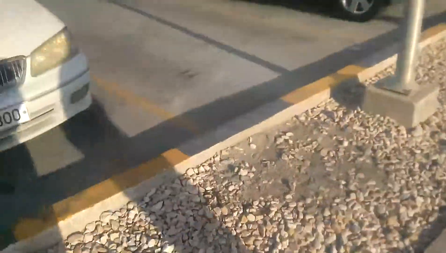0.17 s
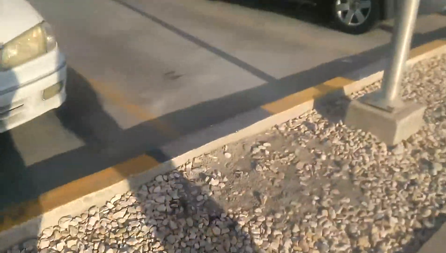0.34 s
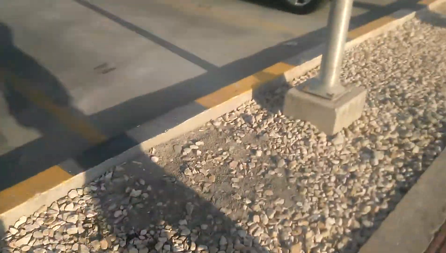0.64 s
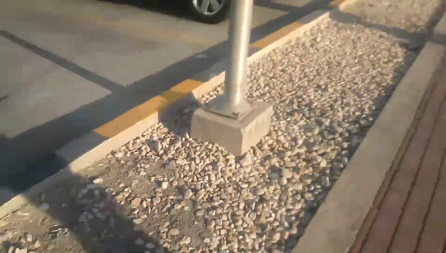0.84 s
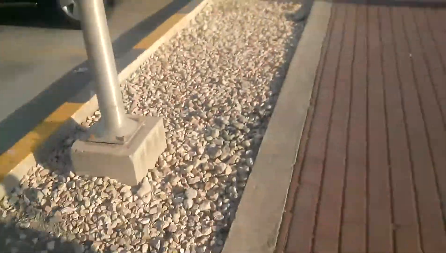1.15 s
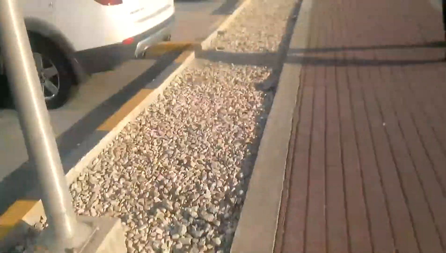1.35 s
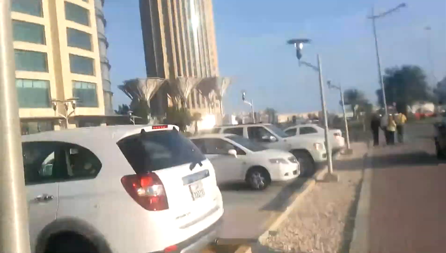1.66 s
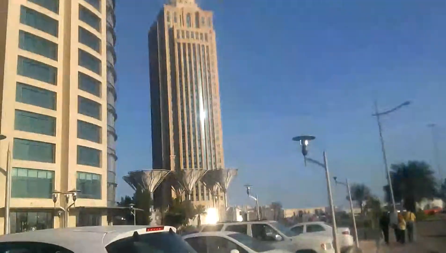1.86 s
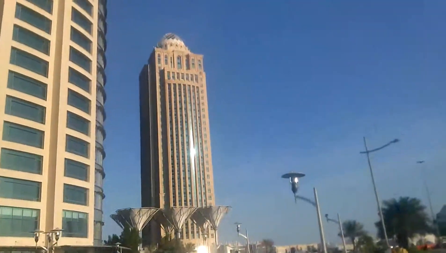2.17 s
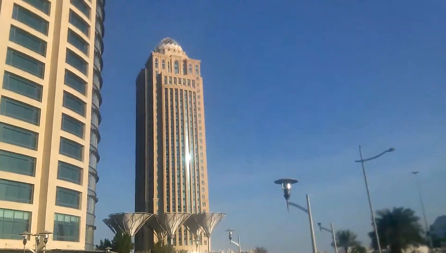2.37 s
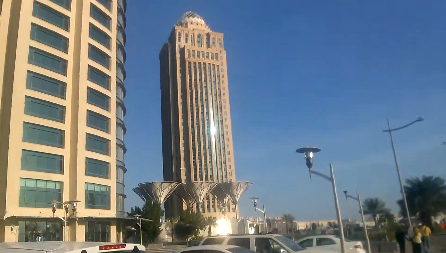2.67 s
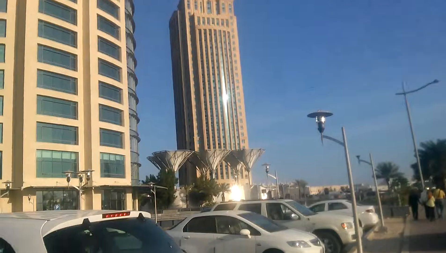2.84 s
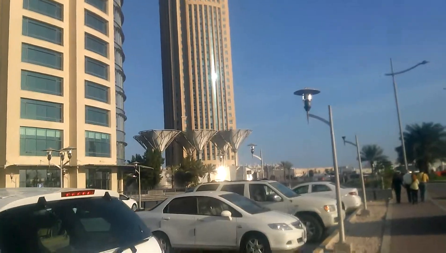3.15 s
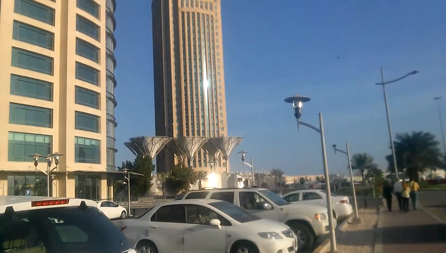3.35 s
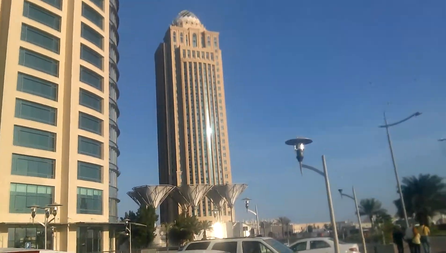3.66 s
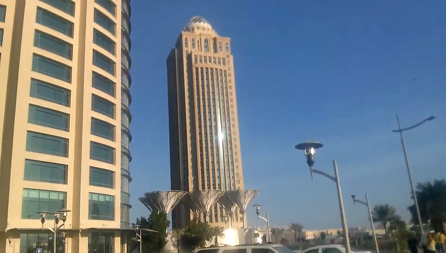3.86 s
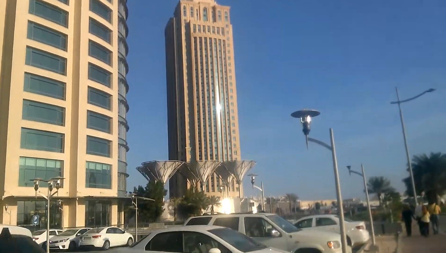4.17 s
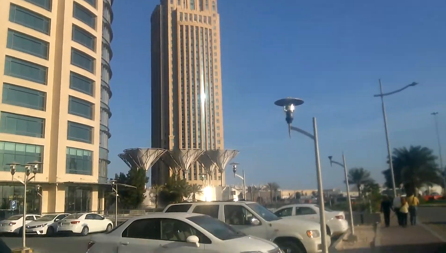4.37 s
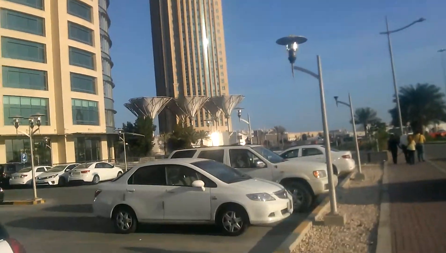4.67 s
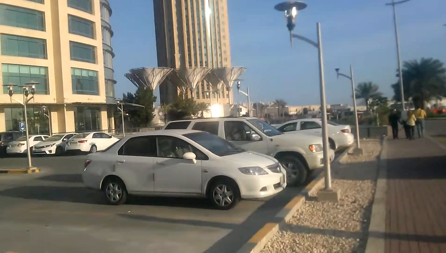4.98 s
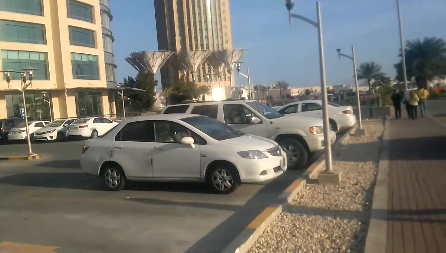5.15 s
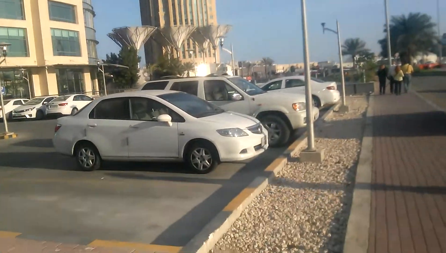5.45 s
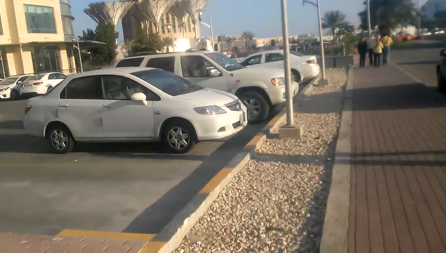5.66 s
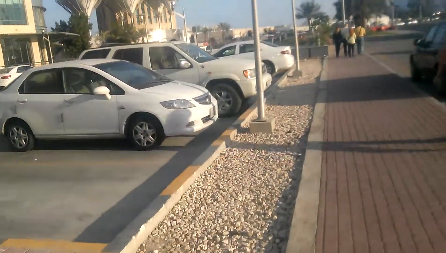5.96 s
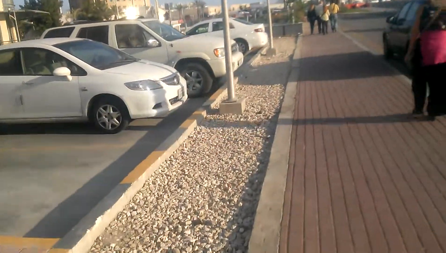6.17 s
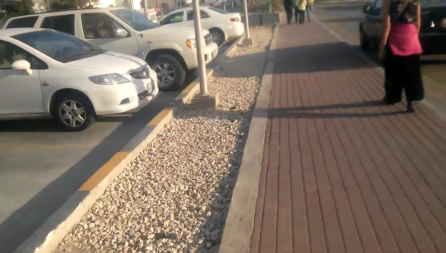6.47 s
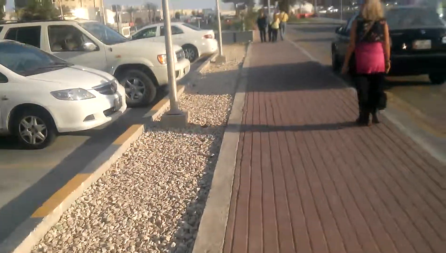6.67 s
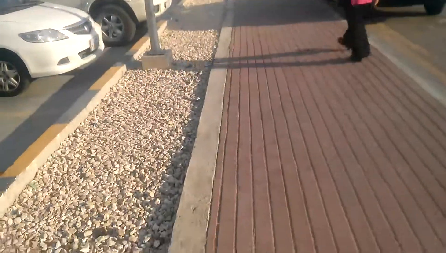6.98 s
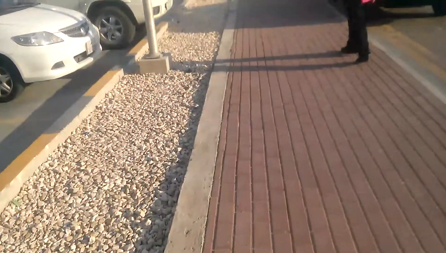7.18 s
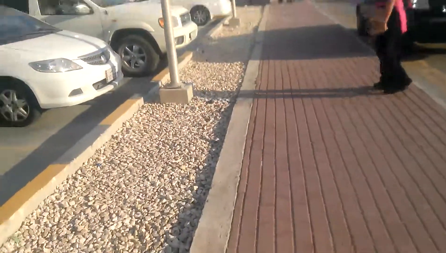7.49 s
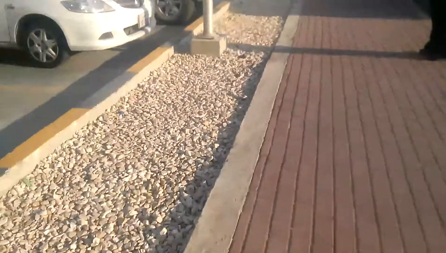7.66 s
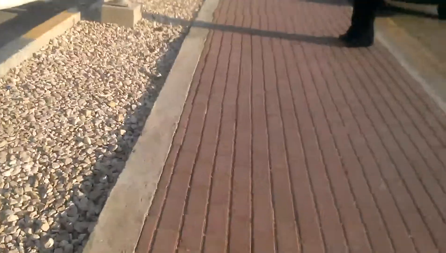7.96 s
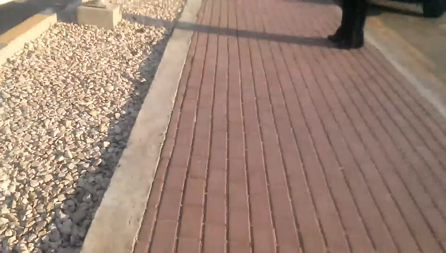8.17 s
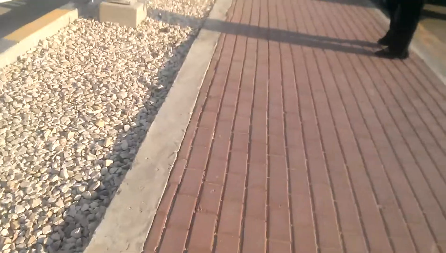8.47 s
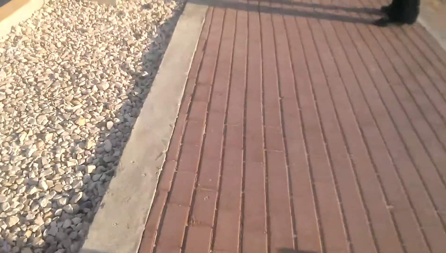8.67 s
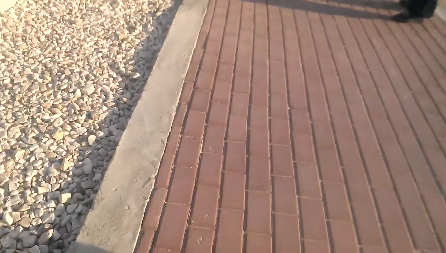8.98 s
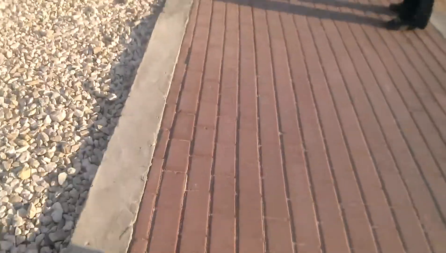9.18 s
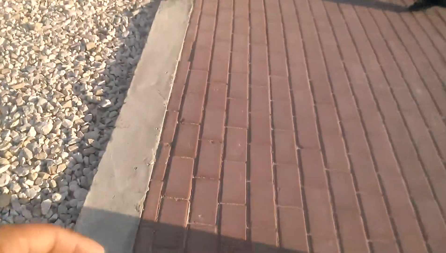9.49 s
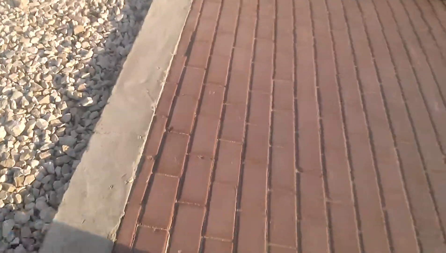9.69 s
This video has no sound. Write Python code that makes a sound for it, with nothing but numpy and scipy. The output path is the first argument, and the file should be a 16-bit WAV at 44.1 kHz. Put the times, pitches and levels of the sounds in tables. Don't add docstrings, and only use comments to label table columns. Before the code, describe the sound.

Gusty wind thumps and rumbles on a bare phone microphone beside a road, a brake squeals thinly, then two cars rush past close by.

```python
import sys
import numpy as np
from scipy import signal
from scipy.io import wavfile
from scipy.ndimage import uniform_filter1d, minimum_filter1d

SR = 44100
rng = np.random.default_rng(int(sys.argv[2]) if len(sys.argv) > 2 else 0)


def nominal_scale(level):
    x = np.asarray(level, float) / 20
    return 10 ** x


def put_to_file(sound):
    columns = np.atleast_2d(sound).T
    safe = np.clip(columns, -1, 1)
    whole_steps = np.round(safe * 32767)
    wavfile.write(sys.argv[1], SR, whole_steps.astype(np.int16))


N = 433503
STEP = 64


def rms_one(x):
    return x / np.sqrt(np.mean(x ** 2) + 1e-20)


def control_times():
    return np.arange(0, N + STEP, STEP) / SR


def in_time(rows):
    s, *columns = np.transpose(rows)
    return [np.interp(control_times(), s, column) for column in columns]


def every_sample(control):
    return np.interp(np.arange(N) / STEP, np.arange(len(control)), control)


def at_hz(points, hz):
    table_hz, table_db = np.array(points).T
    return np.interp(np.log(hz), np.log(table_hz), table_db)


def drift(rate_hz):
    r = np.exp(-2 * np.pi * rate_hz * STEP / SR)
    white = rng.standard_normal(N // STEP + 1002)
    settled = signal.lfilter([1], [1, -2 * r, r * r], white)[1000:]
    return rms_one(settled)


def puff(start_s, length_s, rise_s, fall_s):
    t = control_times()
    before = np.maximum(start_s - t, 0) / rise_s
    after = np.maximum(t - start_s - length_s, 0) / fall_s
    return np.exp(-before ** 2 - after ** 2)


def sounding(rows, fade_s):
    first, last = rows[0][0], rows[-1][0]
    return np.interp(np.arange(N) / SR, [first - fade_s, first, last, last + fade_s], [0, 1, 1, 0])


def resonate(x, hz, width_hz):
    r = np.exp(-np.pi * width_hz / SR)
    poles = [1, -2 * r * np.cos(2 * np.pi * hz / SR), r * r]
    return signal.lfilter([(1 - r * r) / 2, 0, (r * r - 1) / 2], poles, x)


def breathy(rows, width_hz, patchy_db=0):
    hz, level_db = in_time(rows)
    lowpass = signal.butter(2, width_hz / 2, fs=SR, output="sos")
    low = signal.sosfilt(lowpass, rng.standard_normal((2, N)))
    phase = 2 * np.pi * np.cumsum(every_sample(hz)) / SR
    band = rms_one(low[0] * np.cos(phase) + low[1] * np.sin(phase))
    return band * every_sample(nominal_scale(level_db + patchy_db * drift(18))) * sounding(rows, 0.032)


def noise_bank(edges, level_db, steadied=0):
    white, out = rng.standard_normal((2, N + SR)) * np.sqrt(SR / 2), 0
    for k, (low, high) in enumerate(zip(edges, edges[1:])):
        bandpass = signal.butter(2, [low, high], "band", fs=SR, output="sos")
        band = signal.sosfilt(bandpass, white[k % 2])[SR:]
        if steadied:
            local_power = uniform_filter1d(band ** 2, size=5000) + 1e-9
            band = band * (np.mean(band ** 2) / local_power) ** (steadied / 2)
        out = out + band * every_sample(nominal_scale(level_db(np.sqrt(low * high))))
    return out


def limited(x, ceiling):
    over_db = np.maximum(20 * np.log10(np.abs(x) / ceiling + 1e-9), 0)
    slope = 400 * np.arange(N) / SR
    held_db = np.maximum.accumulate(over_db + slope) - slope
    cut_db = -minimum_filter1d(-held_db, size=513)
    return x * nominal_scale(-uniform_filter1d(uniform_filter1d(cut_db, size=257), size=257))


def ducking():
    # (start_s, depth_db)
    drops = [(2.119, 10), (2.85, 0.5), (3.62, 5.5), (4.18, 6.5), (4.95, 1), (9.17, 1), (9.41, 5),
             (9.535, 10.5)]
    t = np.arange(N) / SR
    fall_s, recover_s = 0.015, 0.25
    cut_db = 0
    for start, db in drops:
        fall = np.clip((t - start) / fall_s, 0, 1)
        cut_db = cut_db + db * fall * np.exp(-np.maximum(t - start, 0) / recover_s)
    return nominal_scale(-cut_db)


def tyre_power(colour, band, hz, level_db, tilt=0, pitch=1):
    low, high = band

    def tilted(f):
        return nominal_scale(2 * (at_hz(colour, f / pitch) + tilt * np.log2(f / np.sqrt(low * high))))
    within = sum(tilted(f) * f for f in np.geomspace(low, high, 8)) * np.log(high / low) / 8
    return nominal_scale(2 * level_db) * tilted(hz) / within


def road():
    # (pitch_hz, level_db per Hz)
    far_colour = [(150, 2), (250, -1.5), (553, -12.5), (729, -7), (995, -13), (1480, -26), (1610, -23.5),
                  (2090, -27.5), (2660, -27.5), (3330, -38.5), (4470, -36.5), (6650, -48.5), (8620, -46.5),
                  (12600, -58), (15500, -70)]
    near_colour = [(120, -39), (200, 11), (231, -23), (327, -27), (358, 0), (462, 4.5), (957, 3),
                   (1330, -1.5), (1510, -6), (2210, -5.5), (3180, -11.5), (5110, -12), (7090, -23),
                   (10200, -23), (15500, -39)]
    tail_colour = [(110, -29), (180, 0.5), (261, 5), (321, 9.5), (401, 6), (511, 3.5), (800, -11),
                   (1120, -15), (1590, -27), (1960, -24), (3180, -52), (3620, -37), (4130, -40.5),
                   (9730, -34.5), (15500, -47)]
    # (pitch_hz, level_db per Hz)
    roar_colour = [(400, -18), (650, -12), (950, 13), (1250, -5), (1700, -12), (4000, -45)]
    grit_colour = [(3000, 5.5), (4500, 2), (6500, 5), (8000, -6), (10000, -1), (15500, -19.5)]
    # (time_s, level_db, brightness_db per octave)
    traffic = [(0.0, -46, 3), (0.12, -46, 1.5), (0.68, -49, 0), (1.16, -48.5, 3), (1.32, -47, 1.5),
               (1.5, -46, 2.5), (2.08, -45.5, 1.5), (2.5, -48, 1.5), (3.05, -47, 1), (3.5, -46.5, 1),
               (3.75, -44, 0.5), (4.1, -44.5, 2.5), (4.4, -43.5, 1.5), (4.65, -42.5, 2), (4.95, -44, 0.5),
               (5.3, -41, 2), (5.65, -43.5, 1), (7.0, -37.5, 3), (9.5, -51.5, -2.5), (9.7, -55, -6),
               (9.83, -39.5, -1.5)]
    first_car = [(5.9, -64, -4.5), (6.3, -42.5, 4), (6.69, -36.5, 2), (6.81, -29.5, 0.5), (7.59, -24, 1),
                 (7.8, -30, -0.5), (8.03, -34.5, -2), (8.21, -31.5, -3.5), (8.36, -39, -4)]
    # (time_s, level_db, brightness_db per octave, pitch factor)
    second_car = [(7.55, -40.5, 6, 0.92), (7.77, -20.5, 3, 0.84), (8.1, -21.5, 1, 0.98),
                  (8.38, -16, -0.5, 1.03), (8.55, -18.5, 1, 1.03), (8.73, -18.5, 0.5, 1.1),
                  (9.11, -20.5, 0, 1.01), (9.21, -28, 0, 0.89), (9.83, -27.5, 1, 0.94)]
    # (start_s, length_s, level_db)
    far_cars = [(0.097, 0.23, -41), (0.7, 0.06, -55), (1.086, 0.5, -41.5), (1.9, 0.19, -53),
                (2.45, 0.13, -41.5), (3.2, 0.28, -48), (3.854, 0.14, -45), (4.55, 0.73, -41),
                (9.37, 1, -37.5)]
    # (time_s, centre_hz, depth_db)
    ground_dip = [(4.8, 294, 0), (5.3, 290, 15), (5.6, 310, -3.5), (5.8, 325, 3), (6.2, 336, 29),
                  (7.1, 387, 2.5), (7.6, 560, 3), (7.8, 587, 6), (8.1, 746, 8.5), (8.4, 624, 1),
                  (9.3, 685, -1)]
    hiss, boom, sizzle, roar = (1500, 6000), (300, 560), (6500, 15000), (600, 1300)

    first = puff(first_car[0][0], first_car[-1][0] - first_car[0][0], 0.75, 0.019)
    second = puff(second_car[0][0], 9.0, 0.11, 1)
    grit = puff(8.68, 0.051, 0.25, 0.21)
    singles = sum(nominal_scale(2 * db) * puff(s, length, 0.041, 0.041) for s, length, db in far_cars)
    far_curves, first_curves, second_curves = [in_time(rows) for rows in (traffic, first_car, second_car)]
    together = drift(80)
    dip_hz, dip_db = in_time(ground_dip)

    def level_db(hz):
        power = tyre_power(far_colour, hiss, hz, *far_curves)
        power = power + first * tyre_power(near_colour, hiss, hz, *first_curves)
        power = power + second * tyre_power(tail_colour, boom, hz, *second_curves)
        power = power + grit * tyre_power(grit_colour, sizzle, hz, -45)
        power = power + singles * tyre_power(roar_colour, roar, hz, 0)

        def bell(centre):
            return np.exp(-(np.log2(hz / centre) / 0.34) ** 2)
        dip = dip_db * (bell(dip_hz) - 0.52 * bell(1.406 * dip_hz))
        patches = 1.89 * drift(9.6) + 1.48 * drift(0.63)
        return 10 * np.log10(power) - dip + 0.57 * together + patches
    return noise_bank(np.geomspace(160, 16500, 46), level_db)


def idle():
    # (time_s, level_db)
    loudness = [(0.0, -19.5), (1.05, -30.5), (1.14, -30), (1.34, -22.5), (1.46, -22.5), (1.58, -29),
                (1.67, -21), (2.0, -28.5)]
    # (pitch_hz, level_db)
    orders = [(100, -27), (150, -8), (197, -8), (240, -17)]
    level_db, = in_time(loudness)
    white, width_hz = rng.standard_normal(N), 12
    hum = 0
    for hz, db in orders:
        narrow = resonate(resonate(white, hz, width_hz), hz, width_hz)
        hum = hum + nominal_scale(db) * rms_one(narrow)
    return hum * every_sample(nominal_scale(level_db)) * sounding(loudness, 0.45)


def small_sounds():
    # (time_s, centre_hz, level_db)
    scuff = [(3.035, 9500, -76), (3.055, 9500, -57), (3.08, 9700, -67.5)]
    rustle = [(0.72, 13500, -82), (0.745, 13500, -66), (0.85, 13500, -70), (0.94, 13500, -71),
              (1.0, 13500, -81), (1.28, 13500, -83), (1.31, 13500, -65), (1.4, 13500, -68),
              (1.47, 13500, -81)]
    return breathy(scuff, width_hz=7000) + breathy(rustle, width_hz=4000, patchy_db=5.5)


def ticks():
    # (time_s, peak_db, centre_hz)
    events = [(1.3014, -39, 11500), (1.3534, -48, 11000), (1.3593, -34, 9500), (1.362, -42.5, 11000),
              (1.3714, -42, 11500), (1.39, -44, 11500), (0.5801, -55, 10000), (0.6489, -56, 10000),
              (2.0208, -47, 10000), (4.0856, -44, 9000), (4.4947, -47, 10000), (4.9514, -38, 8540),
              (9.4828, -49, 10000), (8.9286, -27, 11000), (6.32, -28, 3200), (0.65, -42, 2700)]
    decay_s, breadth, trim_db = 0.00054, 0.55, 5
    out, t = np.zeros(N + SR), np.arange(600) / SR
    for s, peak_db, hz in events:
        burst = rng.standard_normal(len(t)) * np.exp(-t / decay_s)
        at = round(s * SR)
        out[at:at + len(t)] += nominal_scale(peak_db + trim_db) * resonate(burst, hz, breadth * hz)
    return out[:N]


def chinks():
    # (time_s, peak_db)
    knocks = [(1.5524, -36), (1.618, -41), (1.6714, -39), (1.732, -43), (1.79, -43)]
    # (pitch_hz, level_db, time to fall 60 dB in s)
    modes = [(5950, -17, .08), (5760, -19, .06), (6100, -20, .06), (7200, -18, .07), (7350, -21, .06),
             (7760, -19, .08)]
    out, t = np.zeros(N), np.arange(5000) / SR
    for s, peak_db in knocks:
        at = round(s * SR)
        for hz, level_db, t60 in modes:
            mode_db = peak_db + level_db + 2.5 * rng.standard_normal()
            swell = (1 - np.exp(-t / 0.0029)) * nominal_scale(mode_db - 60 * t / t60)
            out[at:at + len(t)] += swell * np.sin(2 * np.pi * hz * t)
    return out


def squeal(beads, pitch, octave_db):
    edge_s, sag_db, swell_db = 0.012, 12, 2.5
    rows = []
    for start, end, db in beads:
        rows += [(start - edge_s / 2, db - sag_db), (start + edge_s / 2, db - swell_db)]
        rows += [(start + 0.89 * (end - start), db), (end + edge_s / 2, db - sag_db)]
    level_db, = in_time(sorted(rows))
    hz = in_time(pitch)[0] + 12 * drift(33)
    phase = 2 * np.pi * np.cumsum(every_sample(hz)) / SR
    tone = np.sin(phase) + nominal_scale(octave_db) * np.sin(2 * phase)
    swell = uniform_filter1d(nominal_scale(level_db + 2.2 * drift(90)), size=5)
    return np.sqrt(2) * tone * every_sample(swell) * sounding(rows, 0.01)


def brake_squeals():
    # (start_s, end_s, level_db)
    main_beads = [(1.205, 1.385, -39), (1.39, 1.42, -50), (1.45, 1.51, -55), (1.575, 1.6, -47),
                  (1.62, 1.66, -49), (1.7, 1.75, -50), (1.78, 1.845, -42.5), (1.86, 1.995, -40),
                  (2.01, 2.1, -42.5), (2.13, 2.18, -52), (2.2, 2.24, -50), (2.255, 2.295, -60),
                  (2.33, 2.35, -57), (2.375, 2.42, -47), (2.46, 2.5, -54), (2.535, 2.59, -48),
                  (2.64, 2.68, -53), (2.69, 2.745, -43.5), (2.77, 2.83, -51), (2.86, 2.98, -56)]
    thin_beads = [(1.0, 1.1, -72), (1.11, 1.18, -70), (1.2, 1.3, -72), (1.35, 1.48, -71), (1.65, 1.9, -71)]
    # (time_s, pitch_hz)
    main_pitch = [(1.2, 4680), (1.45, 4705), (2.1, 4738), (2.98, 4768)]
    thin_pitch = [(1.0, 7790), (1.09, 7800), (1.11, 7950), (1.19, 7940), (1.21, 7780), (1.9, 7765)]
    return squeal(main_beads, main_pitch, octave_db=-32) + squeal(thin_beads, thin_pitch, octave_db=-35)


def brake_pads():
    # (time_s, centre_hz, level_db)
    rub = [(0.55, 4100, -61), (0.69, 3960, -64), (0.724, 3960, -44), (0.76, 3960, -55), (0.8, 3960, -50),
           (0.84, 4000, -57), (0.92, 4130, -55), (1.05, 4080, -64)]
    pad_hum = [(1.08, 4000, -66), (1.3, 4000, -59), (1.46, 3970, -59), (1.52, 3960, -68)]
    scrub = [(1.5, 4250, -62), (1.65, 4300, -53), (1.85, 4200, -54), (2.05, 4300, -60), (2.3, 4300, -68)]
    rubbing = breathy(rub, width_hz=380, patchy_db=2) + breathy(pad_hum, width_hz=130)
    return rubbing + breathy(scrub, width_hz=660, patchy_db=5)


def car_tones():
    # (time_s, centre_hz, level_db)
    whine = [(6.41, 3900, -58), (6.428, 4000, -37), (6.445, 3980, -54)]
    belt = [(6.53, 3590, -50), (6.6, 3620, -43), (6.66, 3600, -44), (6.71, 3600, -50), (6.79, 3600, -46),
            (6.85, 3580, -39), (6.9, 3620, -41), (6.95, 3580, -52)]
    # (time_s, centre_hz, level_db)
    tread = [(7.75, 986, -44), (7.88, 997, -36), (8.02, 960, -43), (8.15, 1070, -33), (8.26, 1093, -32),
             (8.38, 1000, -30)]
    arch = [(8.45, 468, -33), (8.62, 520, -23.5), (8.75, 539.6, -17.5), (8.88, 528.7, -31), (9.0, 468, -33),
            (9.1, 452, -33)]
    receding = [(8.9, 1510, -56), (9.2, 1500, -49), (9.5, 1476, -54), (9.83, 1446, -47)]
    whistles = breathy(whine, width_hz=430) + breathy(belt, width_hz=80, patchy_db=4.5)
    hums = breathy(tread, width_hz=64, patchy_db=4) + breathy(arch, width_hz=66, patchy_db=3.5)
    return whistles + hums + breathy(receding, width_hz=200, patchy_db=2)


def air_flow():
    # (time_s, pressure_db, sharpness_db)
    breeze = [(0.0, -17.5, -8.5), (0.75, -21.5, -7), (0.92, -20.5, -7), (1.1, -25.5, -4.5),
              (1.55, -7, -17.5), (1.85, -16, -10.5), (2.16, -11, -7.5), (3.0, -15, -11.5),
              (3.39, -16, -8.5), (3.95, -16.5, -12.5), (4.27, -10, -4), (4.52, -23.5, -11), (6.45, -9, -12),
              (6.81, -19.5, -14.5), (7.2, -11, -14), (7.7, -21, -9), (8.95, -20, -9.5), (9.75, -21, -4),
              (9.83, -28, -11)]
    # (start_s, length_s, pressure_db, sharpness_db)
    gusts = [(1.807, 0.037, -6, -14), (1.909, 0.052, -10, -11), (2.015, 0.097, -7.5, -9),
             (2.28, 0.15, -16.5, -7), (2.586, 0.033, -13, -9), (2.675, 0.073, -19, -5),
             (2.794, 0.054, -13, -5), (3.03, 0.019, -6.5, -13), (3.205, 0.14, -10, -12.5),
             (3.278, 0.084, -11, -6.5), (3.44, 0.15, -9, -11.5), (3.595, 0.013, -13.5, 6),
             (4.148, 0.036, -15, -5), (4.285, 0.061, -23, -10), (3.562, 0.043, -13, -13.5),
             (3.734, 0.083, -20, 2), (3.877, 0.012, -5, -9), (4.077, 0.12, -7, -7),
             (4.262, 0.22, -15, -9.5), (4.583, 0.19, -14, -9.5), (4.82, 0.059, -4, -11),
             (4.885, 0.13, -11.5, -7.5), (5.54, 0.17, -14, -11.5), (5.832, 0.21, -10, -8.5),
             (5.992, 0.063, -9, -7), (6.263, 0.015, -5, -6.5), (6.283, 0.046, -14, -7),
             (6.489, 0.088, -5, -4), (6.582, 0.023, -14.5, 0.5), (4.998, 0.087, -12.5, -10),
             (9.122, 0.028, -15, 2.5), (9.398, 0.04, -8, -9.5), (9.71, 0.037, -12, -9),
             (9.76, 0.02, -11.5, -9.5), (7.182, 0.017, -5.5, -11.5), (8.303, 0.17, -9.5, -10.5),
             (8.67, 0.08, -20, -4), (9.065, 0.18, -11, -8), (9.29, 0.084, -9, -12),
             (9.464, 0.12, -10.5, -5), (9.641, 0.057, -2, -2.5)]
    # (start_s, length_s, pressure_db)
    buffets = [(0.006, 0.02, -7.5), (0.217, 0.029, -17), (0.458, 0.03, -9), (0.555, 0.013, -12),
               (0.87, 0.031, -19), (1.252, 0.013, -29), (1.485, 0.067, -34), (1.658, 0.022, -15),
               (1.99, 0.026, -23), (2.05, 0.039, -23), (2.817, 0.038, -13), (3.29, 0.057, -20),
               (3.5, 0.04, -10), (3.884, 0.034, -11.5), (4.203, 0.058, -14.5), (4.452, 0.022, -12.5),
               (4.623, 0.016, -9), (4.862, 0.027, -23), (5.094, 0.035, -19), (5.135, 0.037, -11),
               (5.25, 0.057, -10), (5.353, 0.055, -16), (5.5, 0.11, -10), (5.7, 0.03, -14),
               (5.823, 0.2, -12), (6.157, 0.03, -24), (6.286, 0.03, -15), (6.466, 0.022, -7.5),
               (6.556, 0.0099, -14), (7.32, 0.048, -10), (8.01, 0.028, -8), (8.997, 0.022, -13.5),
               (9.5, 0.1, -19.5), (9.6, 0.026, -21)]
    breeze_db, breeze_sharp = in_time(breeze)
    parts = [(nominal_scale(2 * breeze_db), breeze_sharp, 1)]
    for s, length, db, sharp in gusts:
        parts.append((nominal_scale(2 * db) * puff(s, length, 0.013, 0.02), sharp, 2.02))
    for s, length, db in buffets:
        parts.append((nominal_scale(2 * (db + 3.5)) * puff(s, length, 0.017, 0.02), -14.5, 1))
    power = sum(p for p, _, _ in parts)
    sharp_db = sum(p * w * sharp for p, sharp, w in parts) / sum(p * w for p, _, w in parts)
    thump_db = -4.5 + 0.92 * (sharp_db + 7.5)
    return 10 * np.log10(power), sharp_db, thump_db


def wind():
    # (pitch_hz, level_db per Hz)
    eddies = [(7.1, -12), (12, 7), (32, -0.5), (86, -2.5), (159, -9), (393, -31), (524, -38), (581, -55),
              (700, -39.5), (910, -70), (1540, -120)]
    usual_db, calm_db, trim_db = -9, -22, -18
    pressure_db, sharp_db, thump_db = air_flow()
    strength = np.clip(uniform_filter1d(pressure_db - calm_db, size=200) / 10, 0, 1.5)
    lumps = drift(28) * strength
    speed = 2 ** (0.17 * (sharp_db - usual_db) + 0.041 * lumps)
    shared_db = pressure_db + trim_db + 1.82 * lumps

    def level_db(hz):
        thump = 0.86 * (thump_db + 6.5) * np.exp(-(np.log2(hz / 85) * 2) ** 2)
        drained = 0.5 * np.maximum(sharp_db - usual_db + 4.5, 0) / (1 + (hz / 45) ** 2)
        return shared_db + at_hz(eddies, hz / speed) + thump - drained + 0.5 * drift(2.5)
    return noise_bank(np.geomspace(10, 900, 16), level_db, steadied=0.66)


def scene():
    cars = road() * ducking() + idle() + car_tones()
    brakes = brake_squeals() + brake_pads() + chinks()
    small = ticks() + small_sounds()
    buffeting = limited(wind(), 0.88)
    return (cars + brakes + small + buffeting)[None]


def roll_off(x):
    return signal.sosfilt(signal.butter(12, 15650, fs=SR, output="sos"), x)


def record(dry):
    fade = np.clip((N - np.arange(N)) / SR / 0.004, 0, 1)
    held = limited(dry[0], 0.975) * fade
    return roll_off(held[None])


dry = scene()
out = record(dry)
put_to_file(out)
```